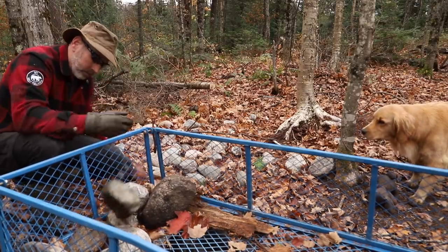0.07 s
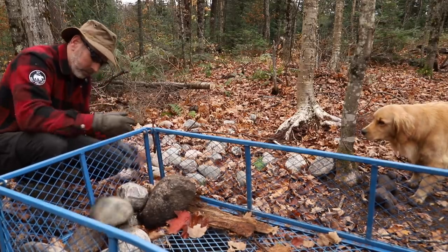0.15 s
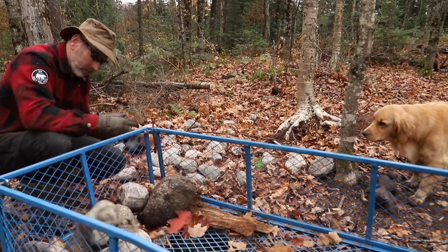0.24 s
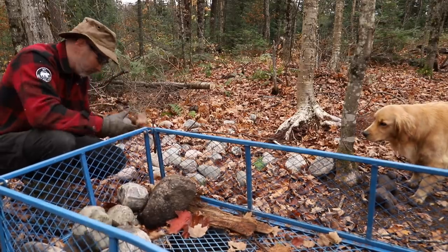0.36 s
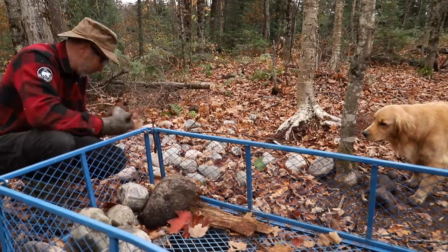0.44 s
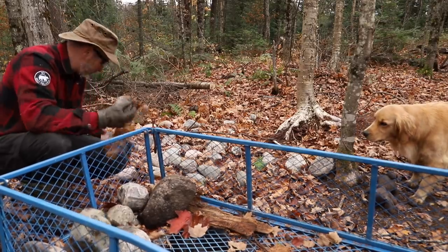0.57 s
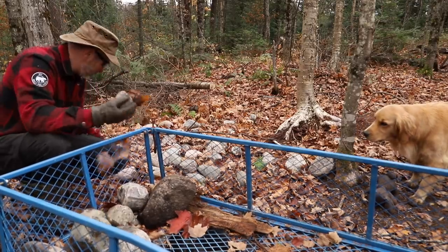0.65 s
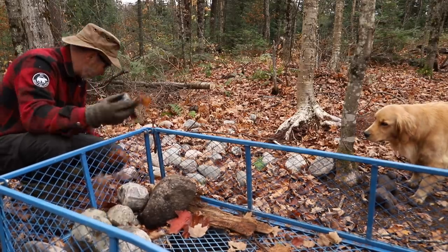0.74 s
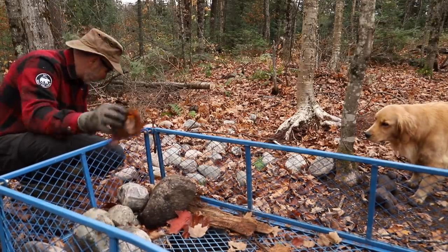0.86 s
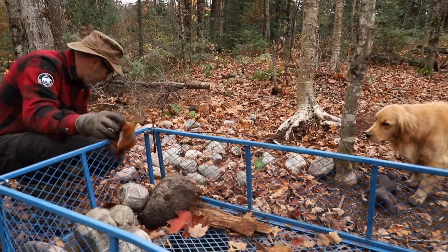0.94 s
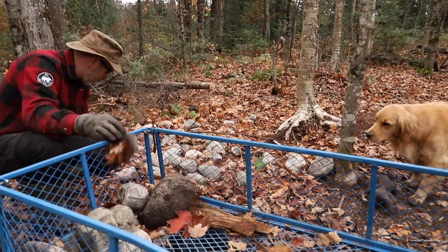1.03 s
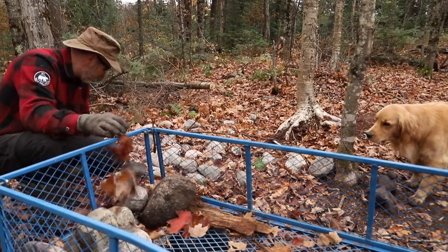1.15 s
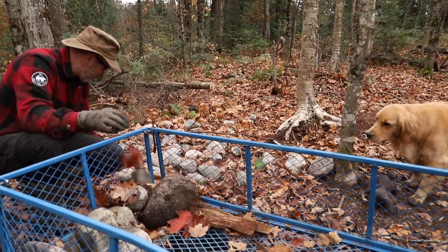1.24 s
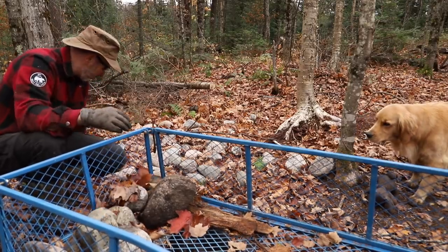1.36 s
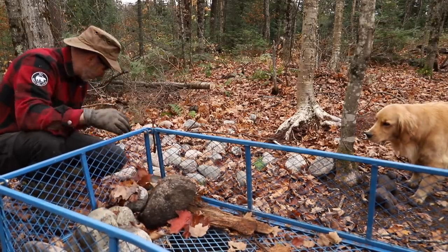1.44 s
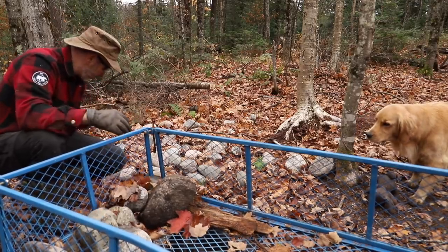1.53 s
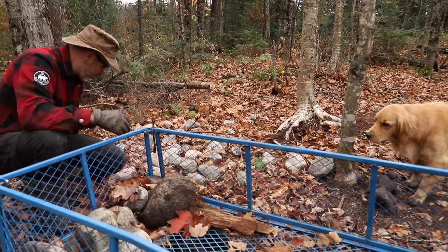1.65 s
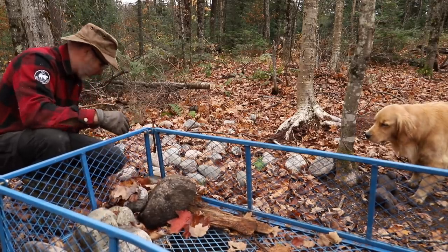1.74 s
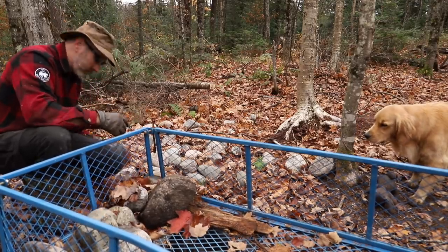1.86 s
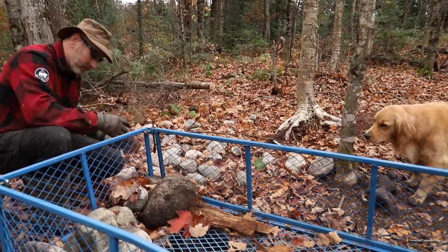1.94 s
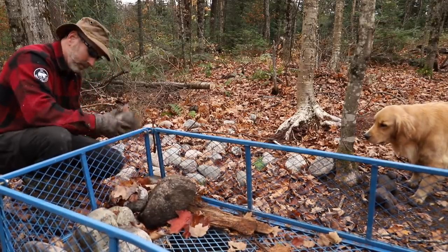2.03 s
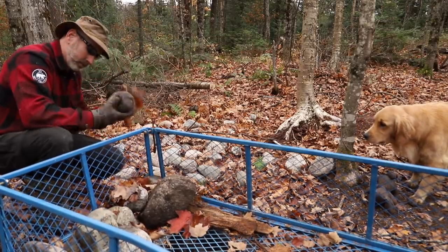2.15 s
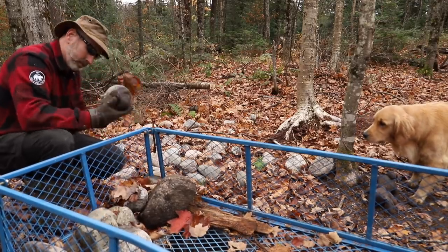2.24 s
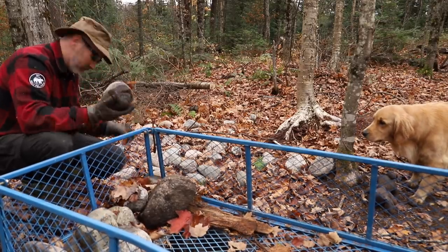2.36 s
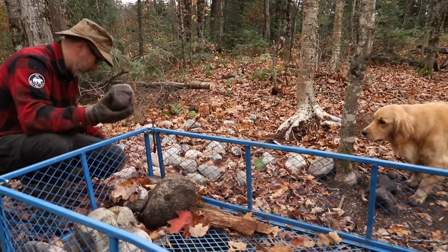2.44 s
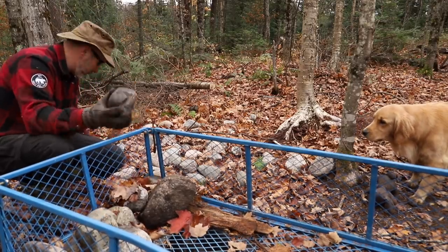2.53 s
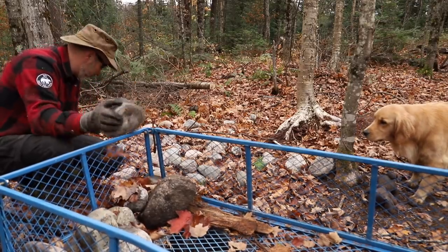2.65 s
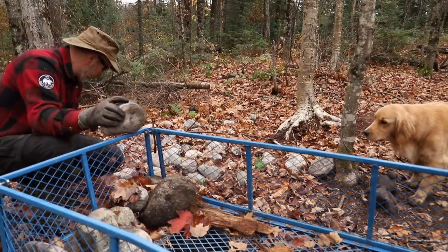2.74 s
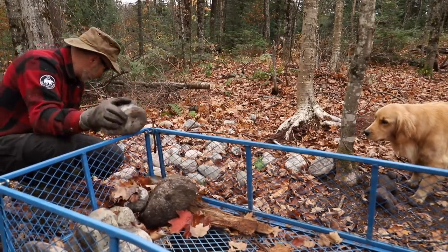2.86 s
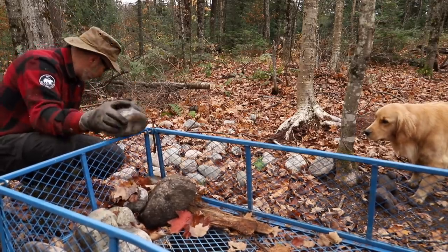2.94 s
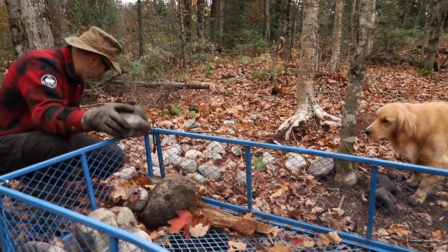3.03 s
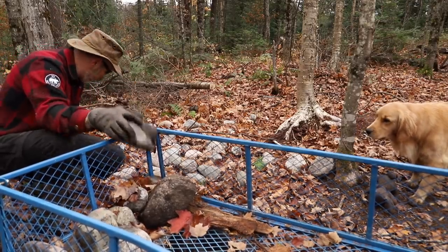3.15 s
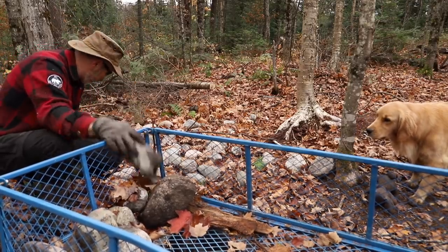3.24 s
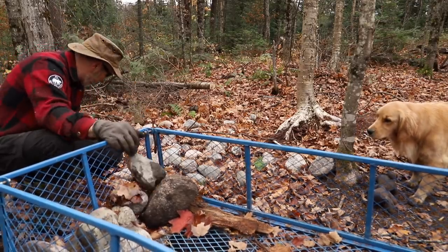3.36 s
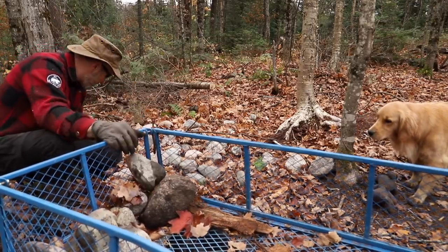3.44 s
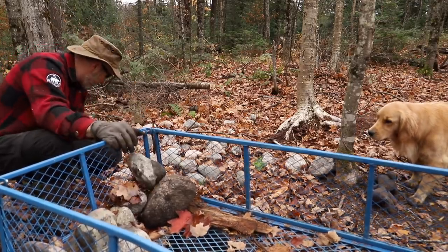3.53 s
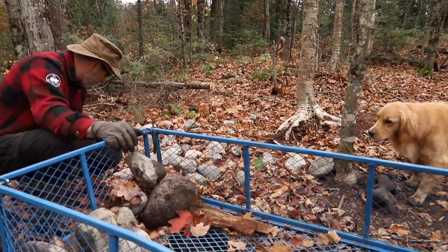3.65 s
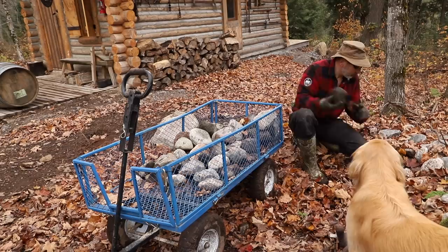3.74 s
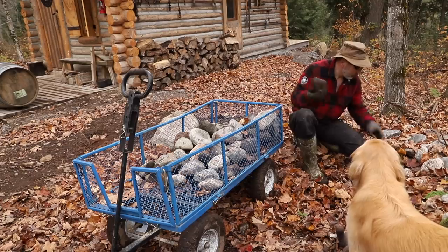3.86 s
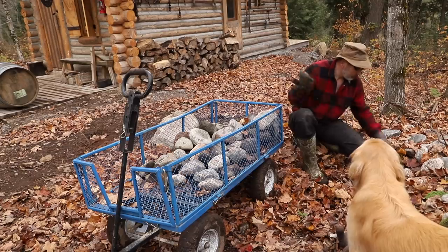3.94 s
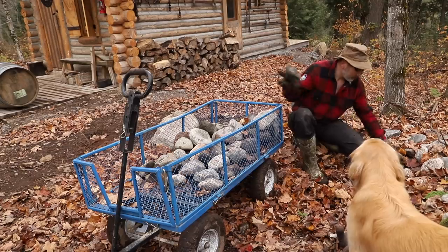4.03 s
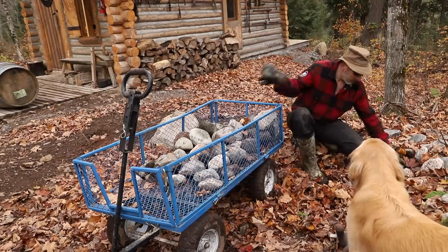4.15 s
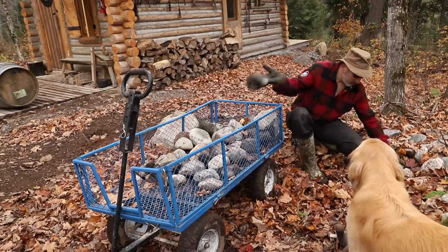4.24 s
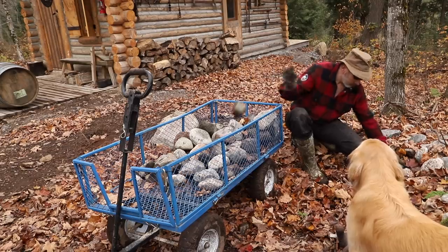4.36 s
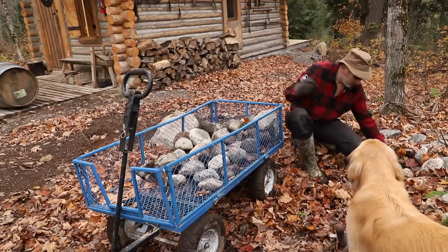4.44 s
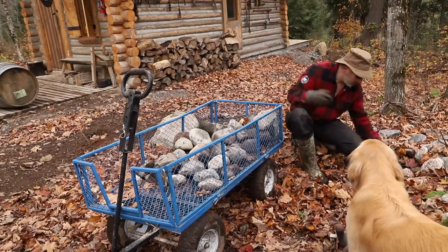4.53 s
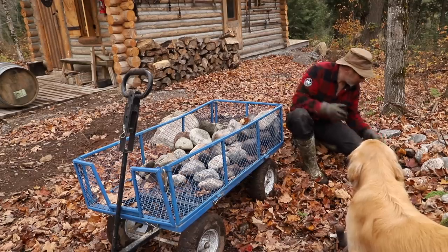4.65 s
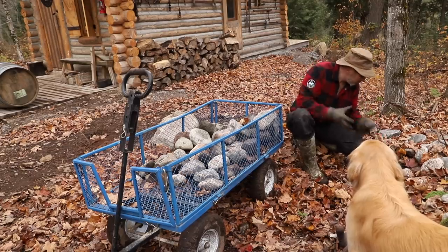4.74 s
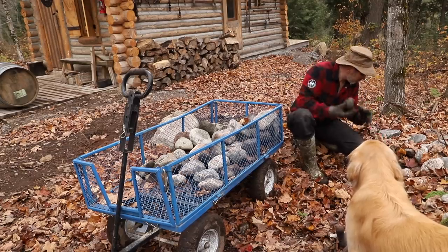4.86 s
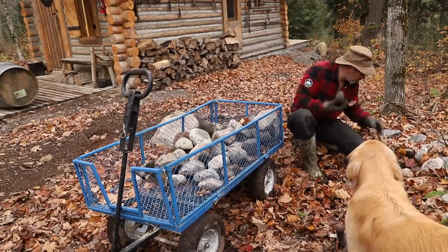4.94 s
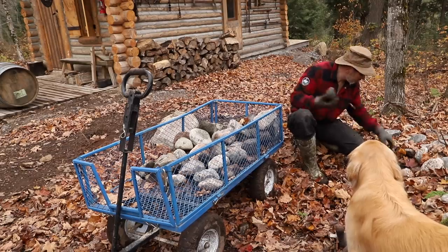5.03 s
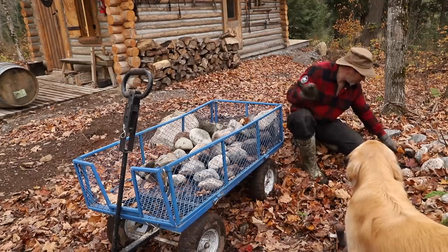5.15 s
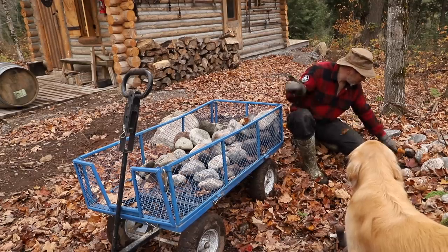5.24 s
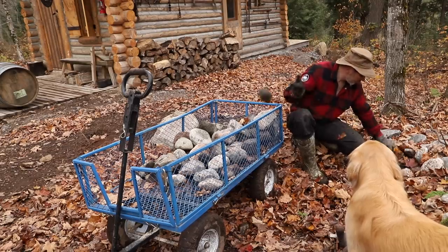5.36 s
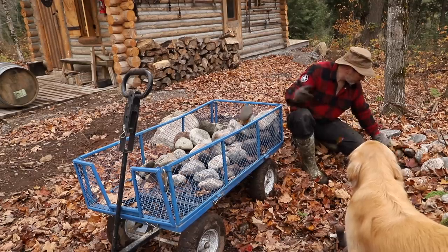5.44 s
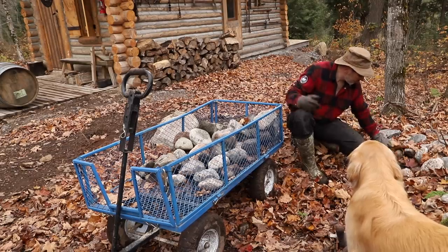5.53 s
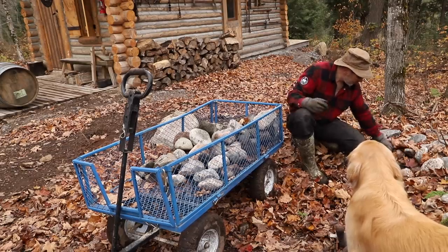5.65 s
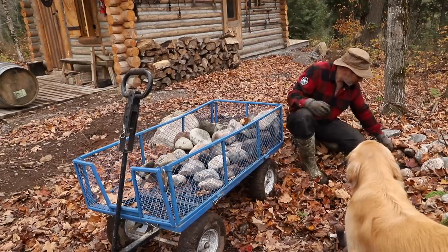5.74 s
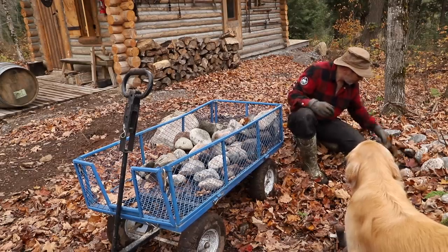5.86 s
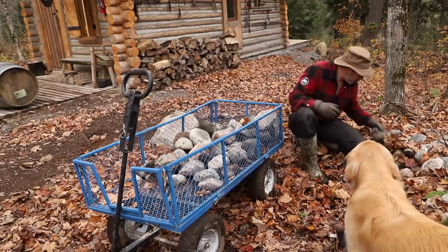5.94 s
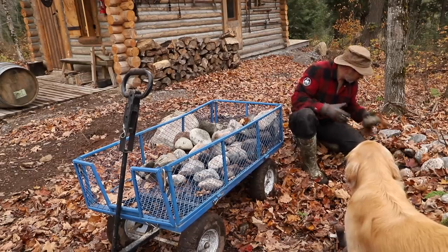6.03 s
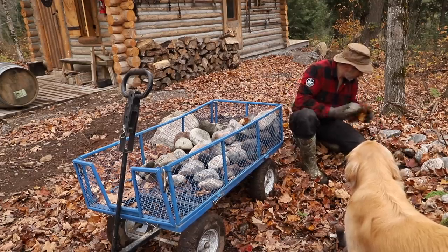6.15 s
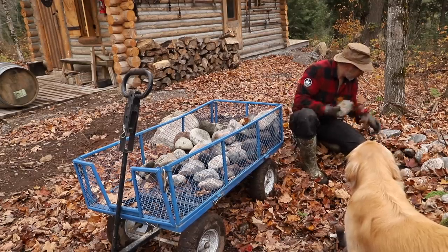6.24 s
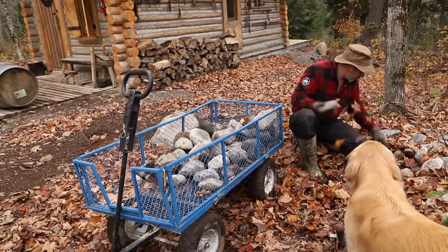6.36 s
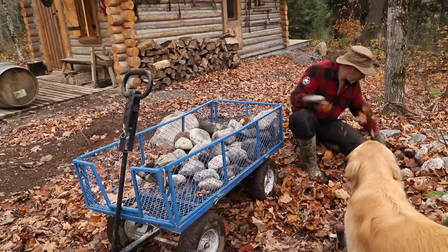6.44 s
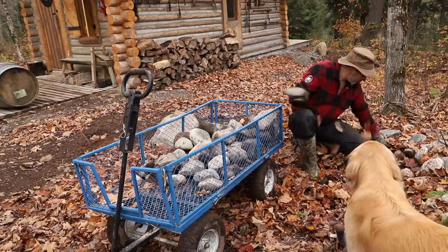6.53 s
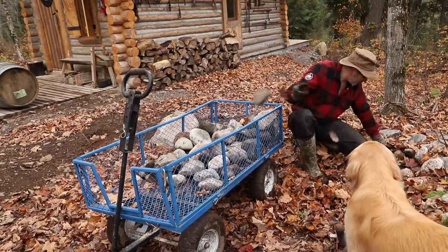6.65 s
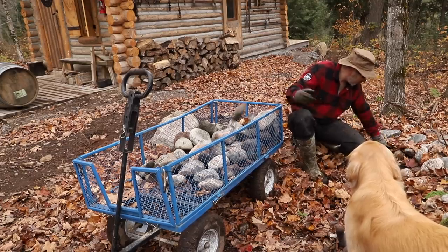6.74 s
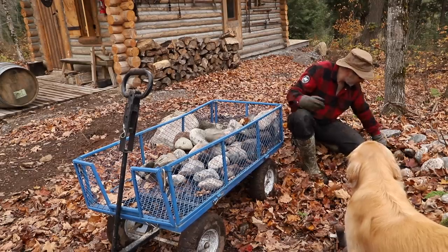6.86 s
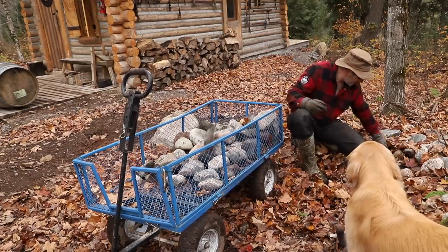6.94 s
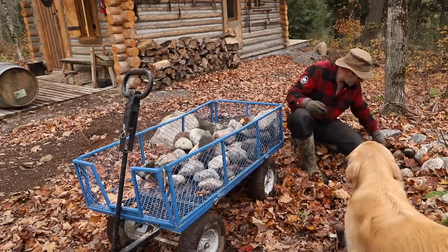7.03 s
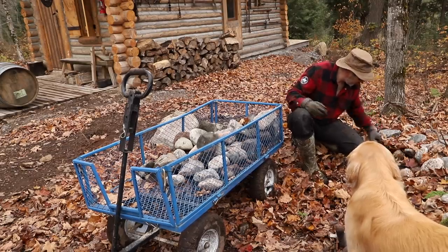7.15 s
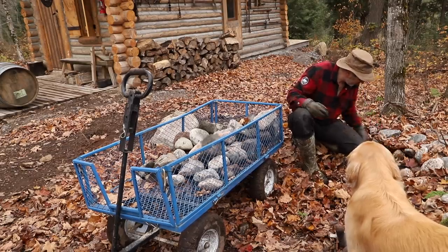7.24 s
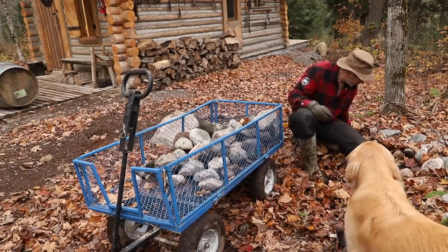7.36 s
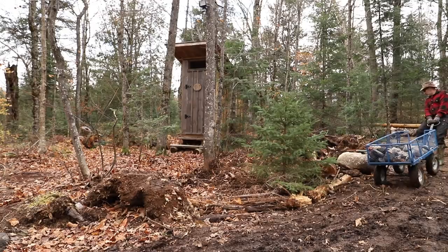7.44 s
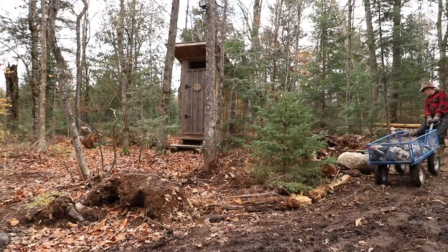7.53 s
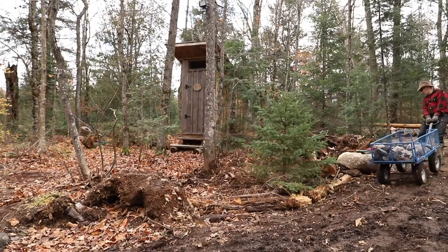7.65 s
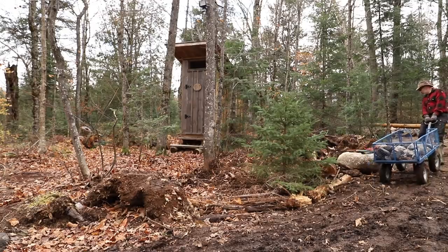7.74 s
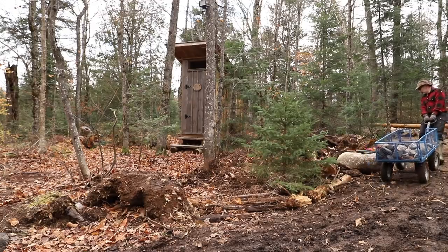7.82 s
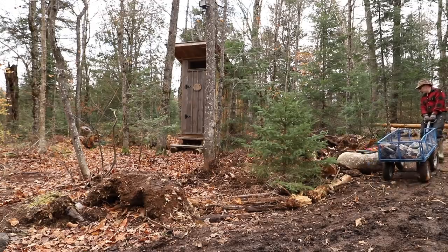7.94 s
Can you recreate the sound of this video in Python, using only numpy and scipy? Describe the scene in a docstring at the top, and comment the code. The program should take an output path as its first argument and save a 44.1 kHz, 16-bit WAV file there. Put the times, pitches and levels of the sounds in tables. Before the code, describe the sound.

Stones clack hard onto each other in a steel mesh wagon that rattles and rings, while gloved hands rustle dry leaves in a quiet forest.

```python
"""Stones clack and bounce on each other, tossed into a steel mesh wagon in a quiet autumn forest.
Each clack is a few fast pressure swings; the loudest overload the microphone. The mesh rattles and rings.
Gloved hands rummage in dry leaves, made of tiny random fractures; dull rubs and thuds come from below.
The trees return a soft tail of fading noise, and a faint sine hum lies under the first half."""
import sys
import numpy as np
from scipy import signal
from scipy.fft import rfft, irfft, next_fast_len
from scipy.io import wavfile

SR = 44100
rng = np.random.default_rng(int(sys.argv[2]) if len(sys.argv) > 2 else 0)


def log_audio(samples):
    """Write samples as a 16-bit WAV file to the path given in sys.argv[1]."""
    # one column per channel
    frames = np.atleast_2d(samples).T
    # limit to full scale, then quantise
    limited = np.clip(frames, -1, 1)
    pcm = np.round(limited * 32767).astype(np.int16)
    wavfile.write(sys.argv[1], SR, pcm)


N = 352355
TIME = np.arange(N) / SR   # s

# faint low hum: time_s, level_db
HUM_LEVEL = [(0, -60), (1.8, -58), (2.7, -62), (3.75, -60.5), (3.85, -78)]
HUM_HZ = 80.5
# colour of the still air: pitch_hz, relative_db
AIR_COLOUR = [(25, -6), (60, -3), (130, 7), (400, 6), (1000, 2), (3000, -7.5), (6000, -6.5), (10000, -10.5),
              (16000, -15.5)]
# colour of the tail from the trees: pitch_hz, relative_db
TREE_COLOUR = [(100, -17), (400, 0.5), (1300, -9), (3000, -2.5), (6000, 9), (15000, -5)]
# stereo width of the surroundings: pitch_hz, side_minus_mid_db
OPEN_WIDTH = [(60, -2.5), (400, -5.5), (1300, -4.5), (2400, 1.5), (4400, 5), (8000, -0.5)]

# far rumble of the rolling wagon: time_s, level_db
ROLLING_LEVEL = [(7.42, -86), (7.55, -55), (7.65, -62), (7.73, -45.5), (7.85, -67), (7.99, -48)]
# colour of that rumble: pitch_hz, relative_db
RUMBLE_COLOUR = [(20, 2.5), (55, 4), (130, 0), (400, -6), (900, -8), (2500, -39.5)]

# a glove or sleeve brushes past: middle_s, level_db, half_length_s
BRUSHES = [(0.831, -41, 0.016), (0.936, -36, 0.011), (2.67, -48, 0.023), (4.345, -45, 0.039),
           (4.938, -39, 0.017), (6.297, -34.5, 0.02), (7.728, -49.5, 0.19)]
# colour of rubbing cloth: pitch_hz, relative_db
CLOTH_COLOUR = [(150, -8), (400, -2), (1400, 1), (3000, -1.5), (5000, -6.5), (14000, -30)]

# a stone bumps on soft ground or on the wagon bed: start_s, push_db
THUDS = [(0.276, -25.5), (.979, -27), (4.527, -30), (2.74, -39.5), (3.398, -32), (5.645, -27), (7.088, -31),
         (7.104, -28), (7.379, -34)]
# dull tones set off by a bump: pitch_hz, relative_db, t60_s
SOIL_TONES = [(132, -9.5, 0.15), (252, 0, 0.084), (329, 5, 0.051)]
# a stone is dragged over soil or over the pile: start_s, relative_db, hold_s
DRAGS = [(.005, -34, 0.017), (0.134, -37, 0.22), (.48, -37.5, 0.023), (2.233, -46.5, 0.01),
         (2.657, -44.5, 0.02), (2.99, -40.5, 0.16), (3.646, -48.5, 0.13), (4.776, -45.5, 0.11),
         (6.965, -31.5, 0.019), (7.077, -36, 0.063), (7.394, -39, 0.012), (7.72, -56, 0.34)]
# colour of dull rubbing: pitch_hz, relative_db
RUB_COLOUR = [(25, -33), (60, -2), (130, -4.5), (300, 2), (500, 1), (900, -1.5), (1500, -0.5), (3000, -9.5),
              (8000, -43)]
DRAG_ATTACK_S, DRAG_T60_S, IDLE_RUB_DB = 0.03, 0.33, -61.5
RUB_PER_SHIFT_DB, RUB_PER_SWEEP_DB = -16.5, -12.5   # dull rubbing that goes with every shift and sweep

# a hand or a stone sweeps through dry leaves: start_s, relative_db, hold_s, right_minus_left_db
SWEEPS = [(0.898, -37, 0.055, -1), (1.714, -42.5, 0.15, -1), (1.902, -48, 0.27, -0.5),
          (2.222, -42, 0.011, -2), (2.341, -50.5, 0.048, -2), (2.659, -45.5, 0.046, -3.5),
          (3.015, -37.5, 0.22, -4), (3.3, -43, .14, 5), (3.697, -50, 0.065, 3), (4.308, -53, 0.046, 5),
          (4.732, -48.5, 0.21, 2.5), (5.231, -40, 0.013, 10), (5.418, -42.5, .01, 9.5),
          (5.515, -42.5, 0.051, 9.5), (5.702, -52, 0.04, 7), (6.115, -42, .19, 6), (6.528, -41, 0.18, 7),
          (6.82, -46, 0.25, 6), (6.994, -41, 0.15, 6), (7.234, -41, 0.17, 6.5), (7.39, -42.5, 0.039, 4),
          (7.57, -53.5, 0.4, 6.5)]
# a twig or a stiff leaf snaps: start_s, relative_db
SNAPS = [(2.242, -26), (3.81, -24), (4.727, -18), (5.269, -20), (5.889, -9), (6.144, -17), (6.308, -15.5),
         (6.501, -25), (6.638, -23), (6.708, -15), (6.762, -18), (7.087, -12), (7.119, -11),
         (7.3914, -13.5)]
# colour of dry leaves: pitch_hz, relative_db
LEAF_COLOUR = [(300, -17.5), (1000, -6), (1800, -5.5), (2800, -2.5), (4400, -4.5), (5300, -4.5),
               (6600, -3.5), (8500, -7), (11500, -9.5), (16000, -24)]
SWEEP_ATTACK_S, SWEEP_T60_S, IDLE_RUSTLE_DB = 0.027, 0.38, -60.5
SMALL_SNAPS_PER_S, SMALL_SNAP_DB = 16, 0   # at random; level relative to the rustle around them

# stone grinding over stone: start_s, level_db, length_s, pitch_hz
SCRAPES = [(0.018, -10, 0.0028, 3440), (0.979, -9.5, 0.0085, 3100), (2.776, -22, 0.046, 2870),
           (3.378, -16, 0.029, 2540), (3.546, -21, 0.0071, 4680), (3.603, -22, 0.038, 2580),
           (4.792, -28.5, 0.012, 4780), (5.807, -16.5, 0.06, 3700), (5.912, -26, 0.063, 3870),
           (7.099, -25, 0.045, 3300)]

# stones slide and settle on the mesh: start_s, relative_db, hold_s, t60_s of the dying rattle
SHIFTS = [(.0, -19, 0.034, .8), (.15, -28.5, 0.31, 0.96), (.81, -35.5, 0.007, .8),
          (.99, -22.5, 0.015, 0.53), (1.14, -29, 0.047, .7), (1.3, -27.5, 0.042, .6),
          (1.395, -16.5, 0.0085, .3), (1.49, -21, 0.037, .65), (2.78, -19.5, 0.0068, 0.35),
          (2.88, -31, .08, 0.42), (3.025, -24, 0.017, 0.5), (3.29, -20.5, .01, .6),
          (3.42, -27.5, 0.091, 0.38), (3.55, -29, 0.11, 0.3), (5.83, -24, 0.012, 0.21),
          (5.91, -26, 0.1, .25)]
SHIFT_ATTACK_S = 0.021
# stone on steel: start_s, relative_db of the buzz at its start, t60_s
STRIKES = [(0.9781, 1, 0.045), (1.23, -7, 0.031), (1.243, -2, 0.01), (1.389, -13.5, 0.019),
           (1.484, -18.5, 0.024), (2.7394, -0.5, 0.045), (3.287, -20.5, 0.056), (3.395, -3, 0.08),
           (3.546, -26, 0.049), (3.612, -20.5, 0.019), (5.8129, -17, .2), (5.962, -16.5, 0.033),
           (6.002, -16, 0.039)]
# ringing wires of the mesh: pitch_hz, relative_db, t60_s
MESH_TONES = [(2212, -0.5, 0.064), (2370, -22.5, 0.22), (2480, -19, .25), (2730, -7, 0.083),
              (3010, -4.5, 0.14), (2910, -4.5, 0.079), (2855, 3.5, 0.1), (3040, -8, .2), (3480, -13, .2),
              (3460, -8, 0.3), (4680, -5.5, 0.11), (13060, -27, .25)]
# colour of the mesh buzz: pitch_hz, relative_db
STEEL_COLOUR = [(300, -30.5), (900, -16.5), (1500, -12.5), (2000, -10), (2450, -2), (3000, -7.5),
                (3800, -10), (5200, -14.5), (6700, -13.5), (10000, -20), (13000, -23.5), (16000, -32)]
# stereo width of buzz and rubbing: pitch_hz, side_minus_mid_db
STEEL_WIDTH = [(400, -15.5), (1300, -6), (2400, 2.5), (4400, 3), (8000, -0.5)]

# stone on stone: time_s, blow_db, contact_pitch_hz, crack_db (relative to the blow), cycles of fading swing
CLACKS = [(0.013, -10, 3320, -19.5, 2), (0.0319, -13.5, 1020, -20, 0.67), (0.0412, 5.5, 1350, -13, .75),
          (.062, -7.5, 3100, -18.5, 2.2), (0.0983, -3.5, 1200, -37, 1), (0.1282, -11, 1190, -25, .8),
          (.147, -16.5, 1070, -24, 1.3), (0.2148, -12.5, 1050, -28, 1.1), (0.2741, 9.5, 1518, -12.5, 0.52),
          (0.286, -7.5, 1290, -4, 0.43), (0.3327, 8, 1610, -22, 0.18), (.345, -3, 1500, -24, .6),
          (.427, -14.5, 1280, -30, 2), (.542, -23, 1360, -19, 0.69), (1.2272, 14, 1395, -17.5, 0.67),
          (1.3744, 8, 1840, -17.5, 0.53), (3.3976, -5, 1150, -15, 1.9), (3.4058, -4.5, 1230, -14.5, 0.35),
          (3.6125, -18.5, 2090, -16, 5.4), (3.6165, -6, 3000, -13, 5.7), (3.6628, -16, 1520, -15, 1.8),
          (4.5238, 20.5, 1457, -14.5, 1.07), (4.5444, -5.5, 1500, -21, 0.49),
          (4.564, -2.5, 2000, -22, 0.55), (4.6369, 13.5, 1444, -16.5, 0.52), (4.6494, -6, 1540, -18, 1.2),
          (4.6581, -11, 1340, -21, 0.83), (4.7118, -17, 1300, -32, .8), (4.7946, -17, 835, -12, 0.64),
          (4.8474, -7.5, 940, -31, .8), (5.6449, 17, 1550, -12, 0.7), (5.6515, 4.5, 1930, -12, 0.66),
          (5.658, -0.5, 2900, -3.5, .6), (5.691, -7.5, 1960, -22, 0.43), (5.8579, 7.5, 1600, -31.5, 2),
          (5.8685, -5, 1540, -37, 1.05), (6.919, 6, 1300, -21, 0.54), (6.93, -10, 1100, -9, .4),
          (6.9582, 2, 1710, -22, 0.31), (6.9645, -6.5, 1110, -11.5, 0.55), (7.056, -21, 1200, -1, 0.78),
          (7.0899, -14.5, 470, -13, 0.63), (7.091, -13.5, 1250, -16, .7), (7.3769, -7.5, 1190, -34, 0.28),
          (7.391, -16, 990, -17, 0.36), (7.4636, -8.5, 970, -22, 0.45)]
# air pockets between the piled stones: pitch_hz, relative_db, t60_s
POCKETS = [(276, -38.5, 0.04), (533, -16.5, 0.022), (911, -18, 0.035), (1170, -23, 0.013),
           (1530, -15.5, 0.011), (2154, -15, 0.013), (2530, -13.5, 0.025)]
# a hard blow drives the struck stone against its neighbours:
# delay_s, relative_db (to the blow), pitch_ratio, cycles of fading swing
KNOCK_ON = [(.0006, -19, .63, 3.0), (.0022, -14.5, 1.7, 2.87), (.0055, -23.5, 1.05, 1.6)]
HARD_BLOW_DB, KNOCK_ON_CRACK_DB = 8.5, -25.5

CUTOFF_HZ = 15900   # top of the microphone sound


def from_db(db):
    """Turn decibels into a plain gain."""
    return 10 ** (np.asarray(db) / 20)


def rms_one(x):
    """Scale a signal to an average strength (rms) of 1."""
    return x / np.sqrt(np.mean(x ** 2) + 1e-20)


def level(rows):
    """Gain that follows a dB curve over time."""
    s, db = np.transpose(rows)
    return from_db(np.interp(TIME, s, db))


def pan(right_db):
    """Left and right gains that differ by right_db."""
    return from_db(np.array([[-right_db], [right_db]]) / 2)


def add(track, s, sound):
    """Mix a sound in from time s on."""
    i = max(round(s * SR), 0)
    track[..., i:i + sound.shape[-1]] += sound[..., :N - i]


def dying(t, t60):
    """Gain that falls by 60 dB in t60 seconds."""
    return from_db(-60 * t / t60)


def colour(x, spectrum):
    """Make some pitches stronger than others, by a curve of pitch and dB."""
    hz, db = np.transpose(spectrum)
    size = next_fast_len(x.shape[-1])
    bins = np.arange(size // 2 + 1) * SR / size + 1   # 1 Hz up, to avoid the log of zero
    gain = from_db(np.interp(np.log(bins), np.log(hz), db))
    return irfft(rfft(x, size) * gain, size)[..., :x.shape[-1]]


def spread(pair, spectrum, width):
    """Two unrelated signals become coloured left and right, with rms 1."""
    mid, side = colour(pair, spectrum)
    return rms_one(mid + colour(side, width) * [[1], [-1]])


def grains(per_s, size_db):
    """Two trains of tiny random clicks; a larger size_db makes a few stand out more."""
    sizes = from_db(size_db * np.minimum(rng.exponential(1, (2, N)), 6))
    happens = rng.random((2, N)) < per_s / SR
    return rms_one(sizes * rng.standard_normal((2, N)) * happens)


def ring(x, hz, t60):
    """A unit click sets off a dying sine that starts with a height of 1."""
    r, w = from_db(-60 / (t60 * SR)), 2 * np.pi * hz / SR
    return signal.lfilter([0, np.sin(w)], [1, -2 * r * np.cos(w), r * r], x + 1e-18)


def effort(moves, attack_s):
    """Gain of overlapping movements (s, dB, hold s, t60 s): each swells, holds and dies away."""
    power = np.zeros(N)
    for s, db, hold, t60 in moves:
        start = max(s - 3 * attack_s, 0)
        t = np.arange(start - s, hold + t60, 1 / SR)
        swell = np.exp(-(np.minimum(t, 0) / attack_s) ** 2)
        gain = swell * dying(np.maximum(t - hold, 0), t60)
        add(power, start, (from_db(db) * gain) ** 2)
    return np.sqrt(power)


def background(air_db):
    """Still air among the trees is coloured noise; the faint low hum is a sine."""
    hum = np.sqrt(2) * level(HUM_LEVEL) * np.sin(2 * np.pi * HUM_HZ * TIME)
    air = from_db(air_db) * spread(rng.standard_normal((2, N)), AIR_COLOUR, OPEN_WIDTH)
    return air + hum * pan(-4.5)


def forest(x, wet_db, t60=0.94, treble_t60=0.19, split_hz=3000, build_s=0.0044):
    """Countless trunks throw back a soft tail whose treble dies first."""
    t = np.arange(SR) / SR
    echoes = spread(rng.standard_normal((2, SR)), TREE_COLOUR, OPEN_WIDTH)
    low = signal.sosfilt(signal.butter(1, split_hz, fs=SR, output="sos"), echoes)
    treble = echoes - low
    tail = low * dying(t, t60) + treble * dying(t, treble_t60)
    tail *= 1 - np.exp(-t / build_s)
    tail /= np.sqrt(np.sum(tail ** 2) / 2)
    return from_db(wet_db) * signal.fftconvolve(x, tail, axes=1)[:, :N]


def rolling():
    """The far wagon rumbles: low noise that swells and sinks."""
    return level(ROLLING_LEVEL) * spread(rng.standard_normal((2, N)), RUMBLE_COLOUR, OPEN_WIDTH)


def cloth():
    """Rubbing threads make many tiny clicks, heard as soft swishes that swell and fade."""
    speed = sum(from_db(db) * np.exp(-((TIME - s) / half) ** 2) for s, db, half in BRUSHES)
    return speed * spread(grains(per_s=13000, size_db=1.0), CLOTH_COLOUR, OPEN_WIDTH)


def ground(shifting, sweeping, rub_db):
    """Heavy stones bump and rub, dull and low."""
    bumps = np.zeros(N)
    for s, db in THUDS:
        add(bumps, s, from_db([db]))   # a single click
    thuds = sum(ring(bumps, hz, t60) * from_db(db) for hz, db, t60 in SOIL_TONES)
    dragging = effort([(*drag, DRAG_T60_S) for drag in DRAGS], DRAG_ATTACK_S)
    causes = (dragging, from_db(RUB_PER_SHIFT_DB) * shifting,
              from_db(RUB_PER_SWEEP_DB) * sweeping, from_db(IDLE_RUB_DB))
    rubbing = from_db(rub_db) * np.sqrt(sum(cause ** 2 for cause in causes))
    rubs = rubbing * spread(grains(per_s=2100, size_db=0.0), RUB_COLOUR, STEEL_WIDTH)
    return (thuds + rubs) * pan(-0.905)


def crackle(per_s, size_db, count=12):
    """Tiny fractures, shared among several pitches, each ringing for a few cycles."""
    total = 0
    for hz in 800 * 18 ** np.linspace(0, 1, count):
        fractures = ring(grains(per_s / count, size_db), hz, 5.0 / hz)
        total = total + rms_one(fractures) * np.sqrt(hz)
    return total


def leaves(sweeping, rustle_db=3, snap_db=-10, snap_t60=0.025):
    """Dry leaves crackle in tiny fractures, with now and then a sharper snap."""
    t, flares = np.arange(SR // 10) / SR, np.ones(N)
    for s in TIME[rng.random(N) < SMALL_SNAPS_PER_S / SR]:
        add(flares, s, from_db(SMALL_SNAP_DB) * dying(t, snap_t60))
    crush = from_db(rustle_db) * np.hypot(sweeping, from_db(IDLE_RUSTLE_DB)) * flares
    for s, db in SNAPS:
        add(crush, s, from_db(db + snap_db) * dying(t, snap_t60))
    ringing = rms_one(crackle(per_s=7000, size_db=3.5))
    dry_clicks = 0.98 * grains(per_s=11000, size_db=0.0)
    return crush * spread(ringing + dry_clicks, LEAF_COLOUR, OPEN_WIDTH)


def scrapes(ring_t60=0.0028):
    """Rough faces catch on each other in quick, gritty slips."""
    out = np.zeros((2, N))
    slips = grains(per_s=4000, size_db=0)[:, :SR // 4]
    t = np.arange(SR // 4) / SR
    for s, db, length, hz in SCRAPES:
        shuffled = rng.permuted(slips, axis=1)   # new order of slips each time
        rasp = rms_one(ring(np.gradient(shuffled, axis=1), hz, ring_t60))
        add(out, s, from_db(db) * rasp * np.exp(-(t / length) ** 2))
    return out * pan(1.4)


def jerks(per_s, depth_db):
    """Uneven gain of a contact that sticks and slips."""
    steps = rng.standard_normal(N // 20)
    return from_db(depth_db * np.interp(TIME * per_s, np.arange(len(steps)), steps))


def mesh(shifting, chatter_db=0, ring_db=-10):
    """Blows and shifting stones make the mesh buzz against its frame, and its wires ring on."""
    force = from_db(chatter_db) * shifting * jerks(per_s=66, depth_db=-0.8)
    t = np.arange(SR // 4) / SR
    for s, db, t60 in STRIKES:
        add(force, s, from_db(db) * dying(t, t60))
    buzz = force * spread(grains(per_s=9000, size_db=2.0), STEEL_COLOUR, STEEL_WIDTH)
    touches = force * rng.standard_normal((2, N))
    # long rings gather more energy, so the square root evens them out
    wires = sum(ring(touches, hz, t60) * from_db(db) / np.sqrt(t60) for hz, db, t60 in MESH_TONES)
    left, right = buzz + from_db(ring_db) * buzz.std() * rms_one(wires)
    # the right side is stronger in the presence range, the left at the very top
    return np.array([colour(left, [(900, -2), (2400, -5.0), (4400, -1.5), (12000, -0.5)]),
                     colour(right, [(900, -3), (2400, 1.0), (4400, 2.4), (12000, -3.5)])])


def contacts():
    """Every clack, and the knocks that the hard ones pass on through the pile."""
    passed_on = []
    for s, db, hz, _, _ in CLACKS:
        if db > HARD_BLOW_DB:
            for delay, loss_db, ratio, cycles in KNOCK_ON:
                passed_on.append((s + delay, db + loss_db, hz * ratio, KNOCK_ON_CRACK_DB, cycles))
    return CLACKS + passed_on


def clacks(scatter_db=-10, scatter_t60=0.035, crack_t60=0.019, crack_low_hz=1800, crack_high_hz=3900,
           grit_db=6, pocket_db=-2, lag_s=.00009, rise=0.59):
    """A stone stopped short sends out a few pressure swings; the pile scatters them and its air pockets ring."""
    out, t, lead = np.zeros((2, N)), np.arange(SR // 12) / SR, 1 / 250   # lead: room for the swell, s
    gritty = signal.butter(1, [crack_low_hz, crack_high_hz], "band", fs=SR, output="sos")
    for s, db, hz, crack_db, cycles in contacts():
        # shorter contact, higher pitch; the left hears it first
        turn = hz * (t - lead - np.array([[0], [lag_s]]))
        fade = np.where(turn < 0, rise, cycles)   # in cycles, before and after the middle
        swing = np.sin(2 * np.pi * turn) * np.exp(-(turn / fade) ** 2)

        # many random paths through the pile, mostly shared by both sides
        paths = rng.standard_normal(len(t)) + 0.29 * rng.standard_normal((2, len(t)))
        paths = paths * dying(t, scatter_t60) * (t > .0008)
        paths *= from_db(scatter_db) / np.sqrt(np.sum(paths ** 2) / 2)
        scattered = signal.fftconvolve(swing, paths, axes=1)[:, :len(t)]

        pockets = 0
        for pocket_hz, gain_db, t60 in POCKETS:
            pocket_gain = from_db(gain_db + pocket_db + rng.normal(0, 0.47))
            pockets = pockets + ring(swing, pocket_hz, t60) * pocket_gain
        pockets = pockets * 2 * hz / SR   # makes up for longer swings pushing for more samples

        # crushed grit at the point of contact gives the bright edge
        grit = rng.standard_normal(len(t)) + 1.2 * rng.standard_normal((2, len(t)))
        crack = signal.sosfilt(gritty, signal.sosfilt(gritty, grit * dying(t, crack_t60)))
        add(out, s - lead, from_db(db) * (swing + scattered + pockets))
        add(out, s, from_db(db + crack_db + grit_db) * crack)
    return out * pan(0.78)


def scene():
    """The wagon and its echo among the trees, with softer sounds from the ground around it."""
    shifting = effort(SHIFTS, SHIFT_ATTACK_S)
    sides = []
    for side in (-1, 1):   # left, right
        moves = [(s, db + side * right_db / 2, hold, SWEEP_T60_S) for s, db, hold, right_db in SWEEPS]
        sides.append(effort(moves, SWEEP_ATTACK_S))
    sweeping = np.array(sides)
    around = rolling() + cloth() + ground(shifting, sweeping, rub_db=1) + leaves(sweeping)
    wagon = scrapes() + mesh(shifting) + clacks()
    return background(air_db=-55.5) + forest(wagon, wet_db=-20.0) + around + wagon


def record(dry):
    """The loudest clacks overload into flat tops; the highest treble is cut."""
    clipped = np.clip(dry, -1, 1)
    return signal.sosfilt(signal.ellip(10, .1, 70, CUTOFF_HZ, fs=SR, output="sos"), clipped)


dry = scene()
out = record(dry)
log_audio(out)
```